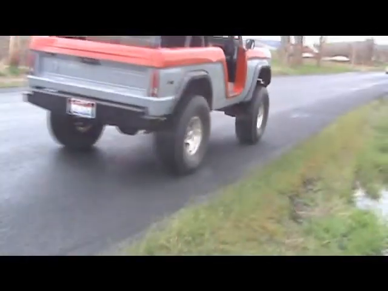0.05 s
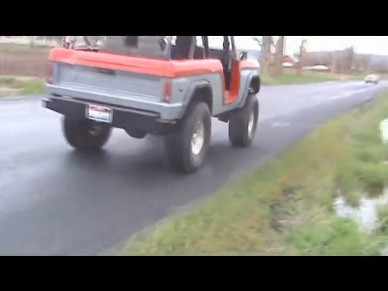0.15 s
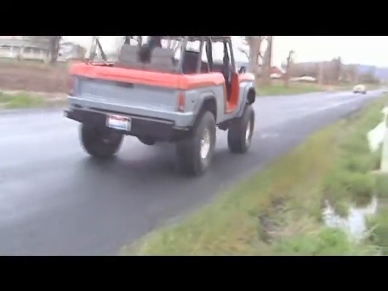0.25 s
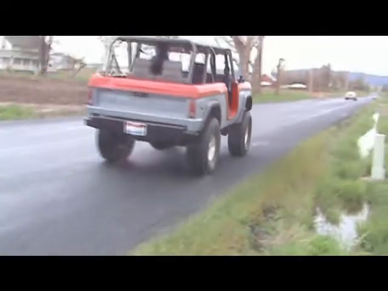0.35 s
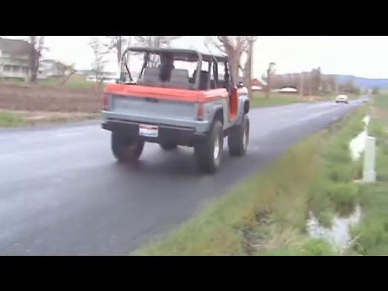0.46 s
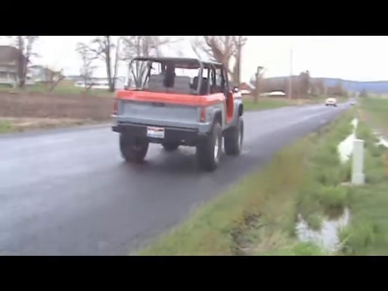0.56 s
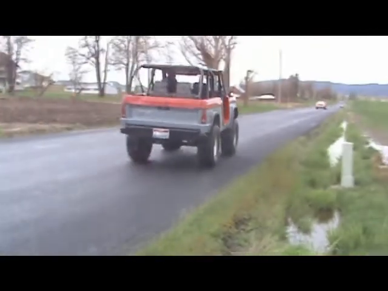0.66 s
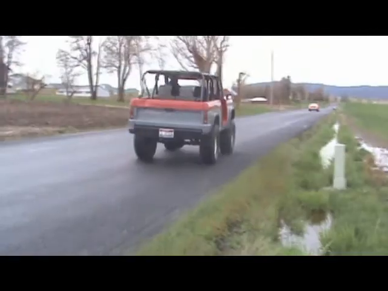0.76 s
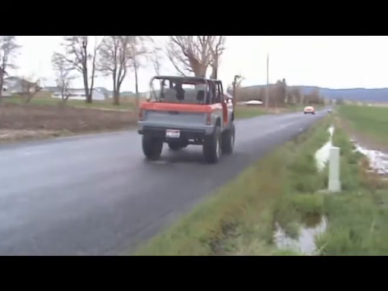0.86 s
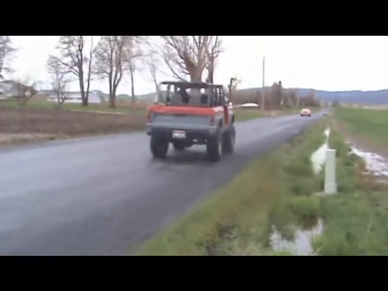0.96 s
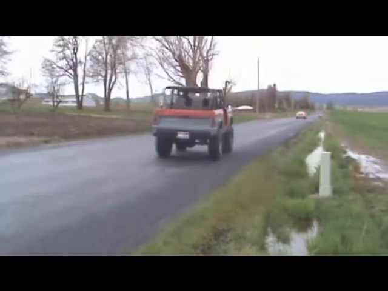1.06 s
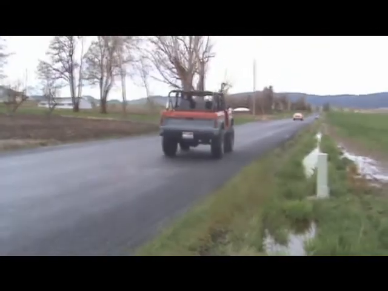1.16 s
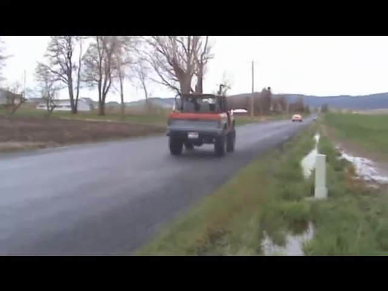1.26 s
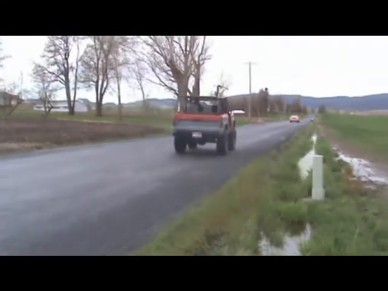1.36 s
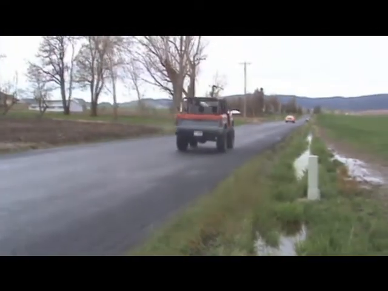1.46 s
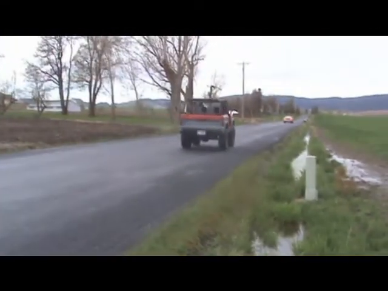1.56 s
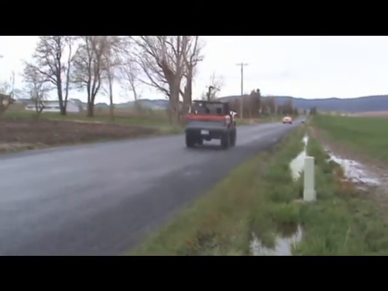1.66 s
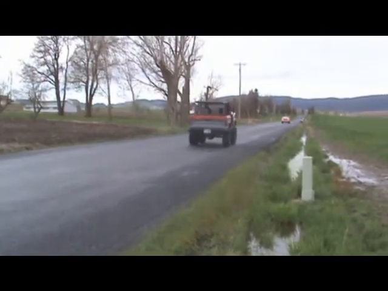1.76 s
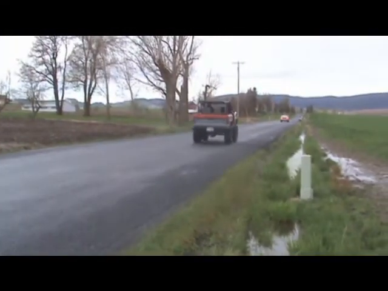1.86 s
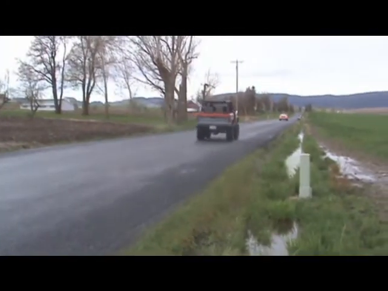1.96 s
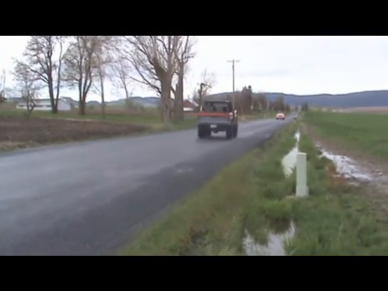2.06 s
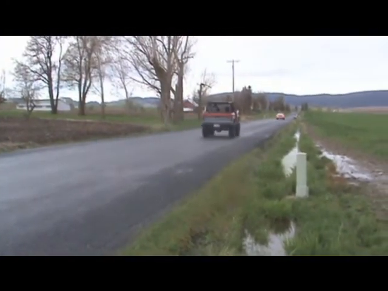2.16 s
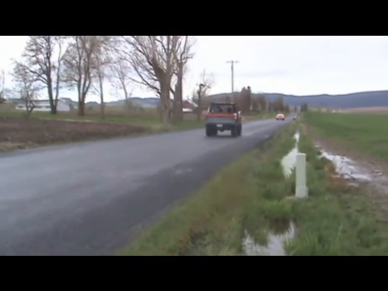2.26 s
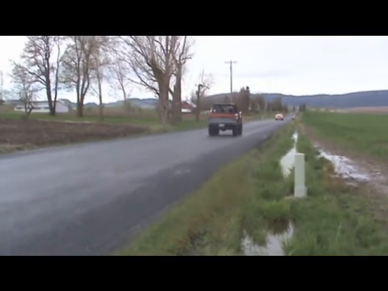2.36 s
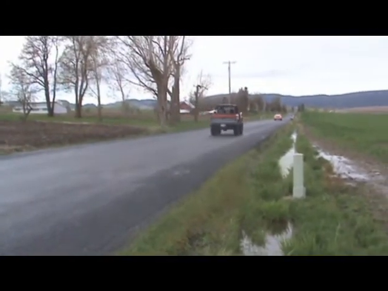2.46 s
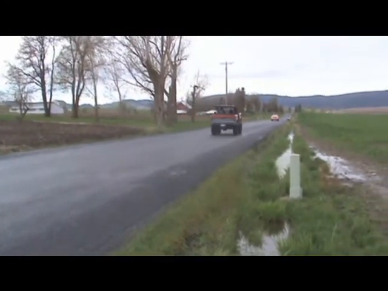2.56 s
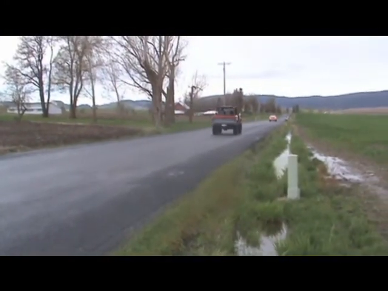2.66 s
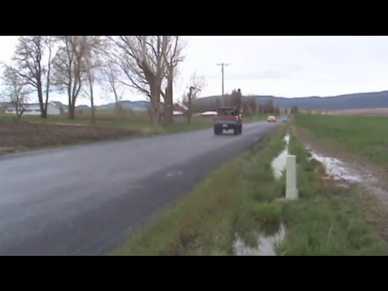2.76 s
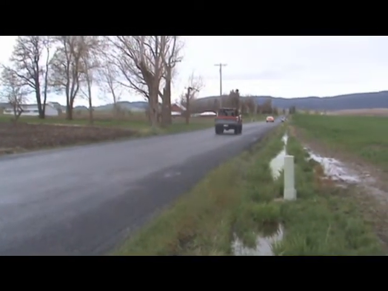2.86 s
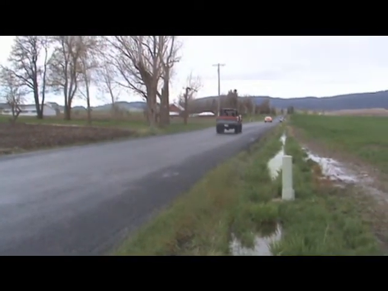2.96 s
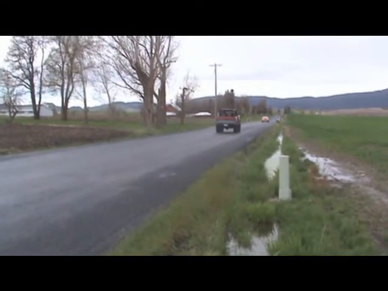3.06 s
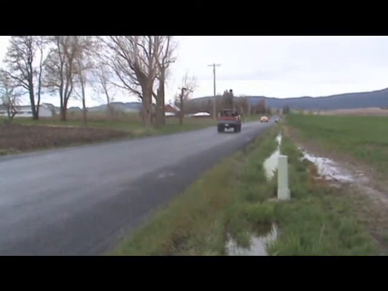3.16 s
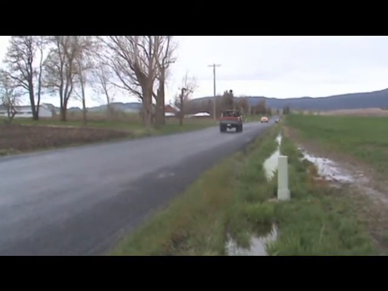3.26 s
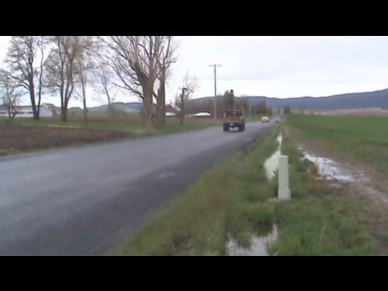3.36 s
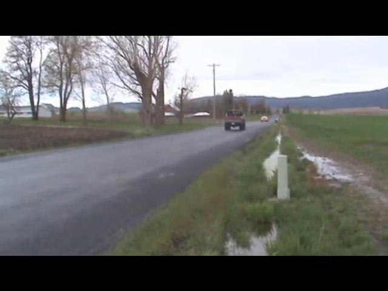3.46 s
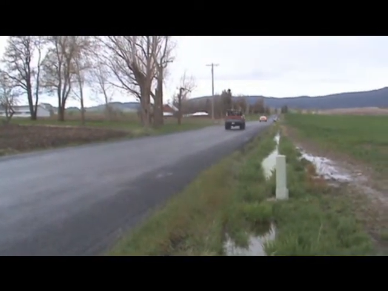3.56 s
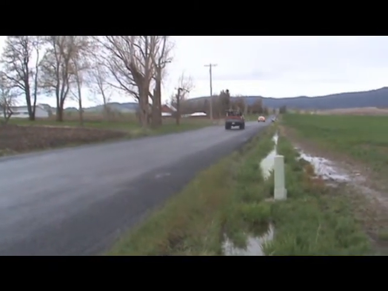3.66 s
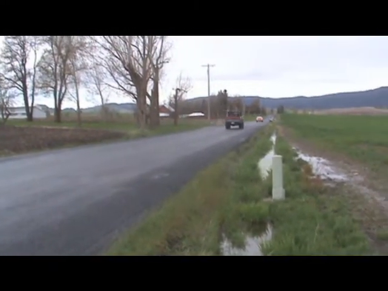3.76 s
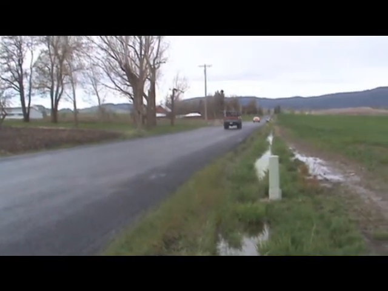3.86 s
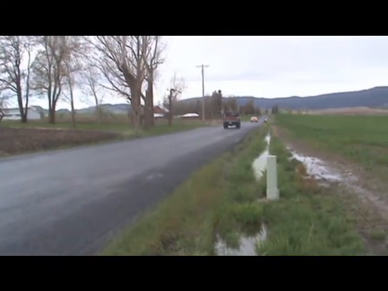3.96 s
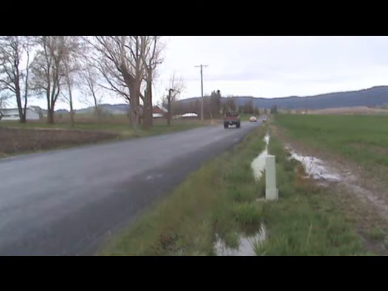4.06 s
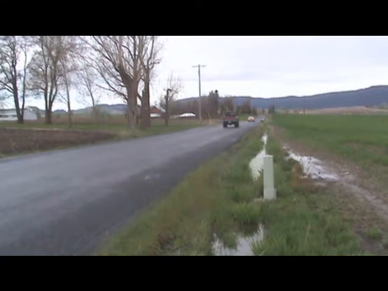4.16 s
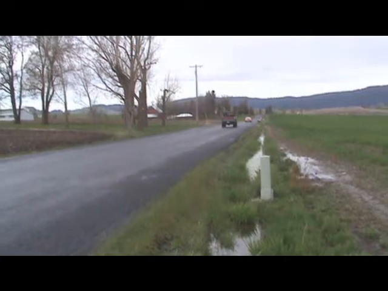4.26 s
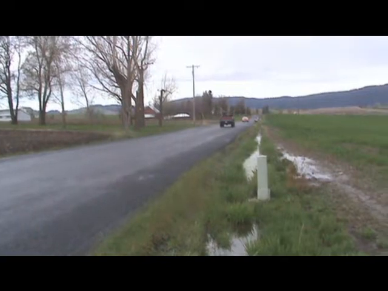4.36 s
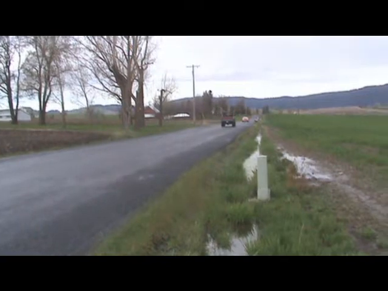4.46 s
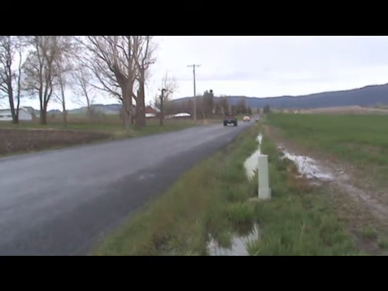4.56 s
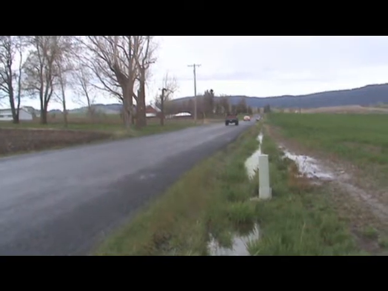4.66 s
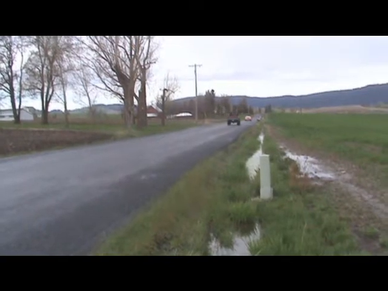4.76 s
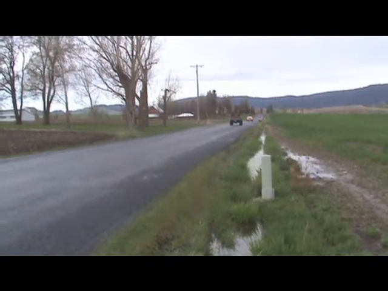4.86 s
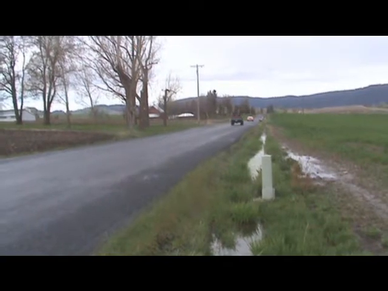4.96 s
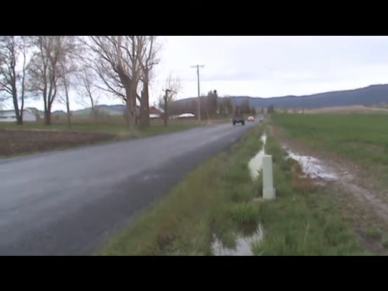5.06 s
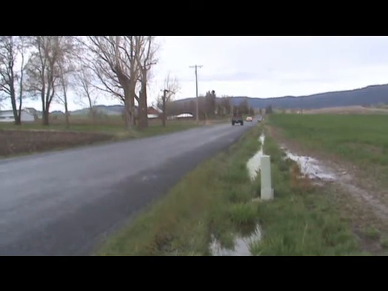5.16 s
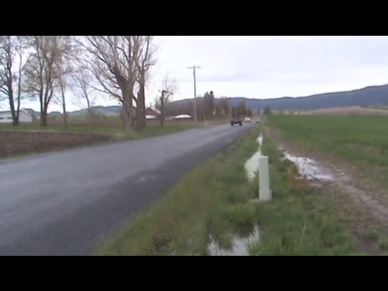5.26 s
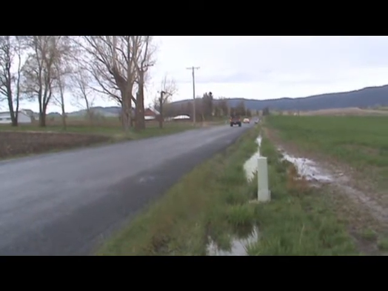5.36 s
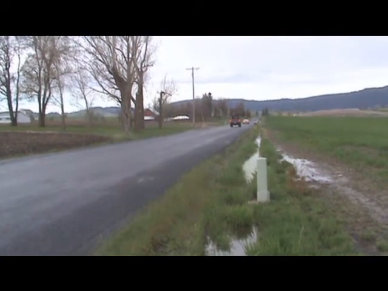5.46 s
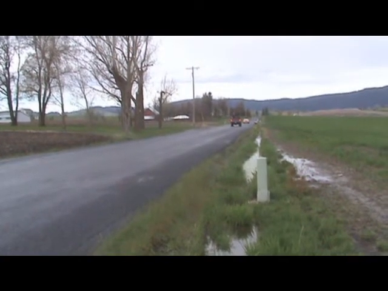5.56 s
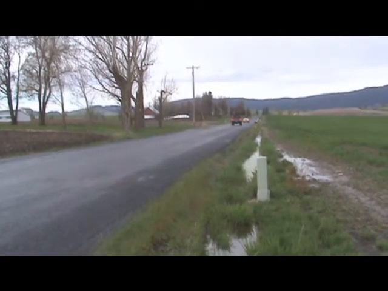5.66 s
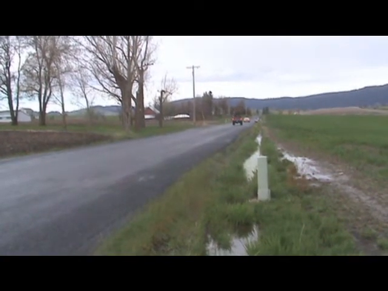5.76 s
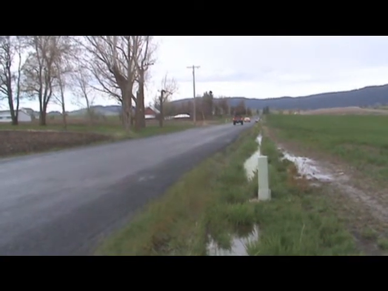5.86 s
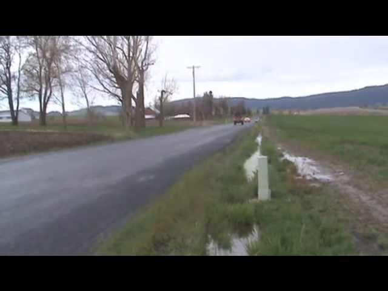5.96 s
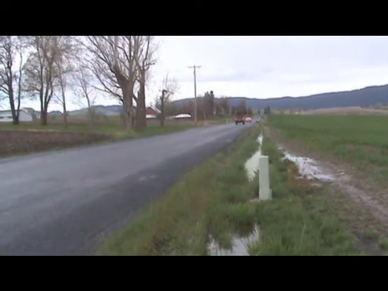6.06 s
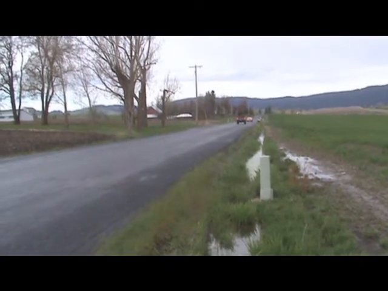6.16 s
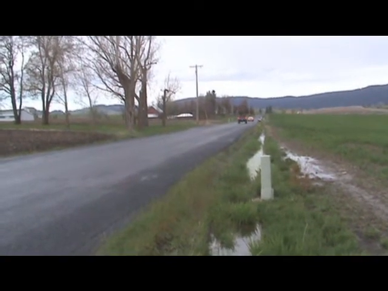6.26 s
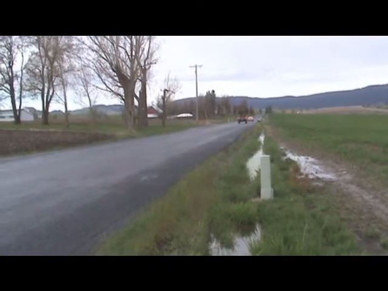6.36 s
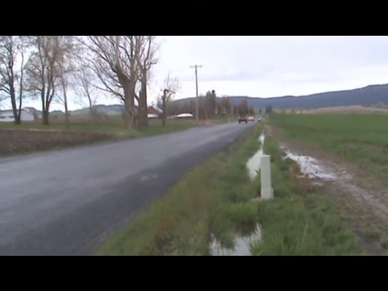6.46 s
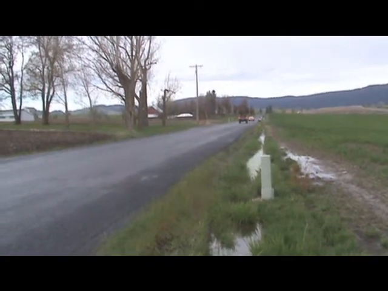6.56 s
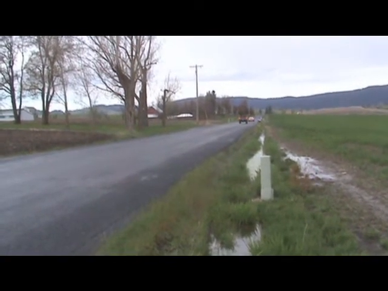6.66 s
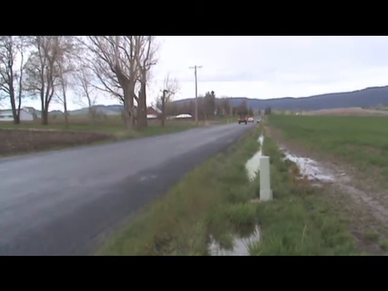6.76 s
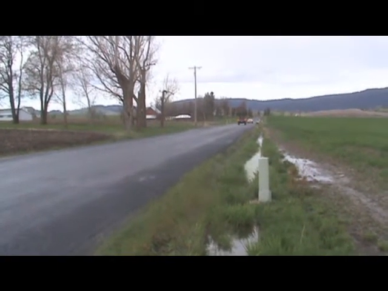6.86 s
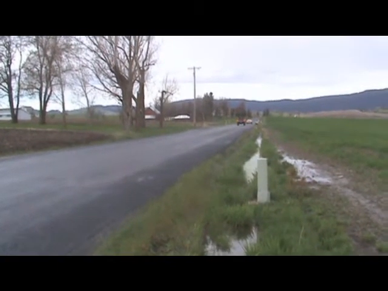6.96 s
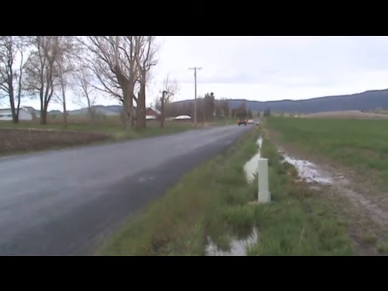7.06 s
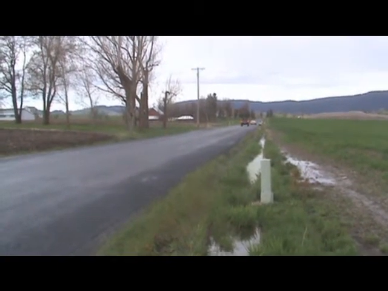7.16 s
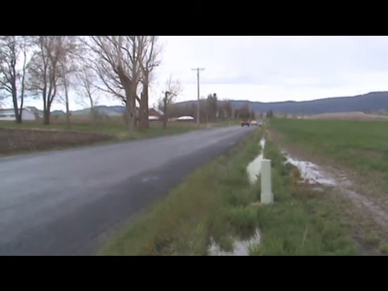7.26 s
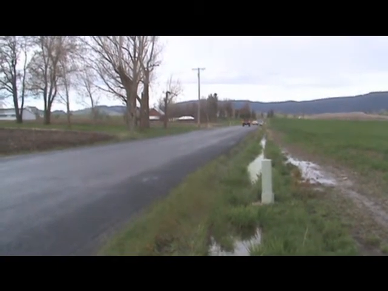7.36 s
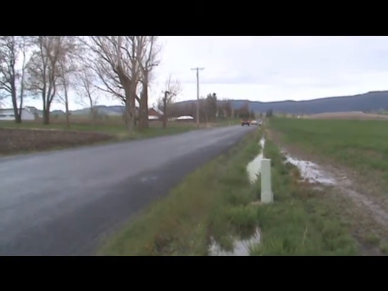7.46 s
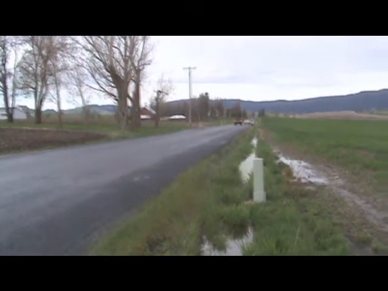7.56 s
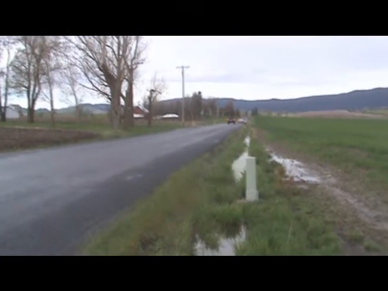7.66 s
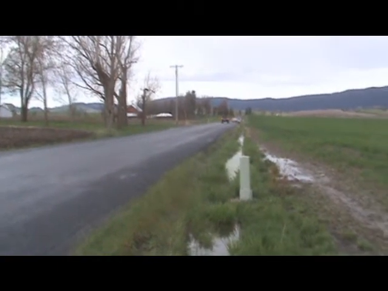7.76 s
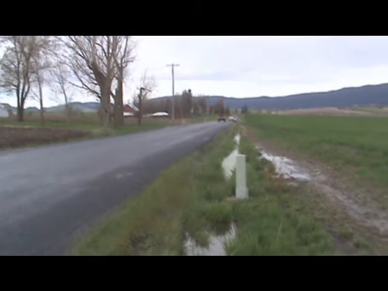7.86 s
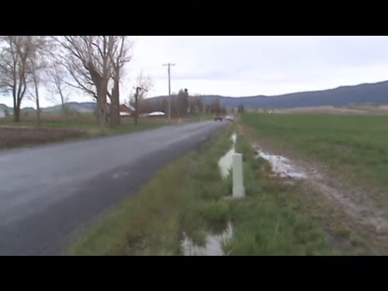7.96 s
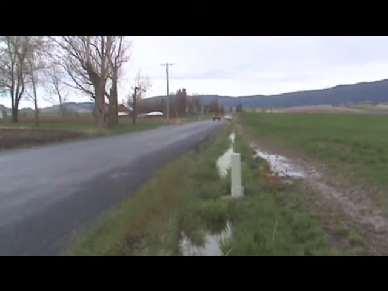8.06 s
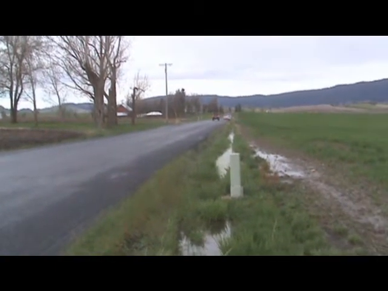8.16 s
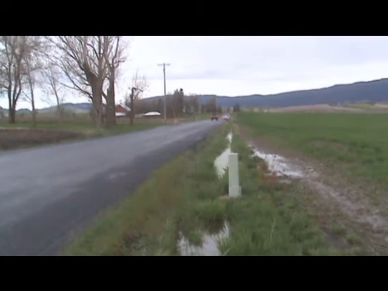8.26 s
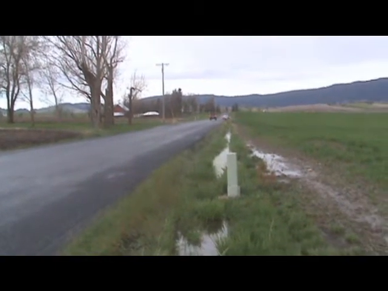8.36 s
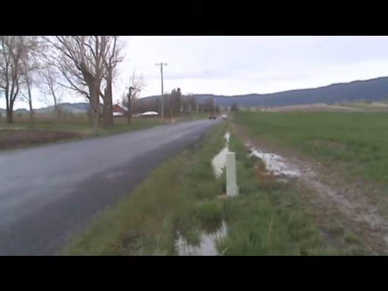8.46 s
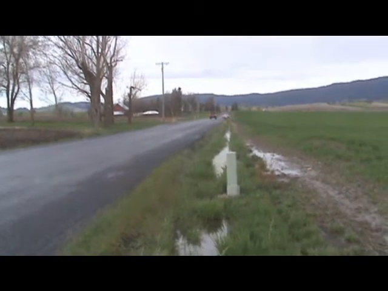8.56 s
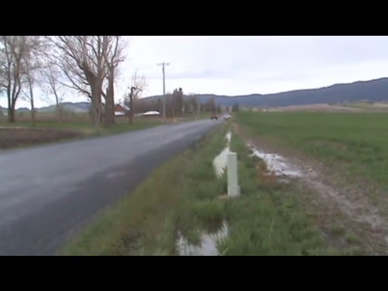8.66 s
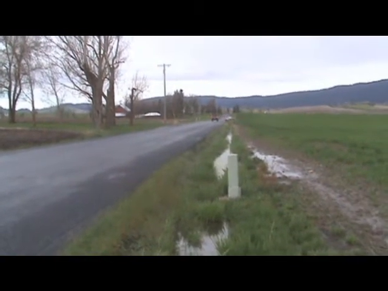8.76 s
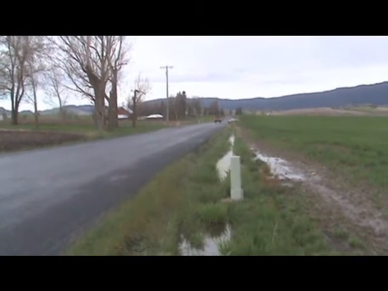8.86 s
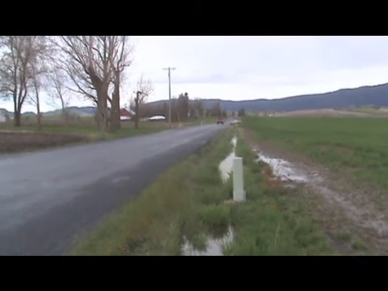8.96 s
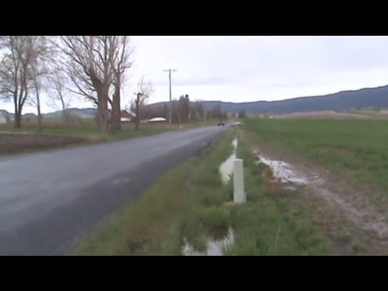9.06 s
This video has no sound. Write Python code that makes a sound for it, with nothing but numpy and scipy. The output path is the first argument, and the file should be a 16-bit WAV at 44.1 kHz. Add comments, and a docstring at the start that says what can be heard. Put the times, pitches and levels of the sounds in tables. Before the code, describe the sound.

Loud, uneven V8 exhaust roars off from close by, revs climbing with harsh rasps, before the throttle closes and only faint muffler thuds remain.

```python
"""A country road: an old open off-roader with a V8 pulls away from the microphones, booming and rasping.
Uneven firings ring modelled exhaust pipes, crack in the tailpipe and shed bursts of gas noise.
The driver lifts off after four and a half seconds: the engine drops to a far, uneven burble
from the muffler, the tyres' coloured noise fades, and thin gear tones sink with the road speed.
A dull echo from trees and houses and faint, still air lie around it."""
import sys
import numpy as np
from scipy import signal
from scipy.fft import rfft, irfft, next_fast_len
from scipy.io import wavfile
from scipy.ndimage import map_coordinates

SR = 44100
rng = np.random.default_rng(int(sys.argv[2]) if len(sys.argv) > 2 else 0)


def transcribe(signal):
    """Save signal, clipped to [-1, 1], as a 16-bit WAV file at the path in sys.argv[1]."""
    frames = np.atleast_2d(signal).T
    limited = np.clip(frames, -1, 1)
    pcm = np.round(limited * 32767).astype(np.int16)
    wavfile.write(sys.argv[1], SR, pcm)


N = 401295
TIME = np.arange(N) / SR

LIFT_S, CLOSING_S = 4.583, 0.38  # the driver lifts off; time the throttle takes to shut
# engine speed: time_s, rate_hz (four-stroke cycles per second)
CYCLE_RATE = [(0, 19.46), (.3, 20.195), (.7, 21.75), (1, 23.25), (1.5, 26.367), (2, 29.624), (2.4, 32.218),
              (2.7, 33.943), (3, 35.656), (3.5, 38.214), (4, 40.338), (4.48, 41.95), (4.53, 41.6),
              (4.6, 39.5), (4.7, 36.3), (4.8, 33.6), (5, 26.4), (5.2, 22.7), (5.5, 19.7), (5.75, 16.8),
              (6, 16.25), (7, 14.5), (7.6, 13.8), (9.1, 13.1)]
# exhaust pipe (0 or 1) that each of the eight cylinders feeds, in firing order
BANKS = (0, 1, 0, 0, 1, 0, 1, 1)
# colour of the top-treble gas noise, also used for the ticks: freq_hz, level_db (relative)
FIZZ_COLOUR = [(2120, -11), (3600, -3.5), (3990, -11), (4480, -7.5), (5160, -8.5), (5790, -18.5),
               (6920, -11), (8600, -11.5), (14200, -41)]


def amp(db):
    """Decibels to gain."""
    return 10 ** (np.asarray(db) / 20)


def unit(x):
    """Scale to rms 1."""
    return x / np.sqrt(np.mean(x ** 2) + 1e-20)


def steady(x):
    """Scale to rms 1 over every few engine cycles, keeping the single beats."""
    window = np.hanning(SR // 4)
    smooth = lambda v: signal.fftconvolve(v, window, "same")
    power = smooth(x * x) / smooth(np.ones(N))
    return x / np.sqrt(np.abs(power) + 1e-14)


def along(points, hz):
    """(Hz, value) points read on a log axis."""
    f, v = np.transpose(points)
    return np.interp(np.log(hz + 1), np.log(f + 1), v)


def curves(rows):
    """One value per sample for each column after the time."""
    s, *cols = np.transpose(rows)
    return [np.interp(TIME, s, c) for c in cols]


def wobble(rate):
    """A smooth random curve, rate knots a second."""
    knots = rng.standard_normal(int(N * rate / SR) + 4)
    return map_coordinates(knots, [TIME * rate])


def swell(s, length):
    """A smooth bump of height 1 around a moment."""
    return np.exp(-(2 * (TIME - s) / length) ** 2)


def spell(x, s, length, db):
    """Let x swell to a level around a moment and fade again."""
    bump = swell(s, length)
    return amp(db) * bump * x / np.sqrt(np.average(x * x, weights=bump) + 1e-20)


def filtered(x, response):
    """x times a complex response of frequency."""
    size = next_fast_len(N + SR // 2)
    spectrum = rfft(x, size) * response(np.fft.rfftfreq(size, 1 / SR))
    return irfft(spectrum, size)[..., :N]


def below(hz, edge):
    """Response of a steep low-pass without phase shift."""
    return 1 / (1 + (hz / edge) ** 10)


def cut(x, hz, kind, order=4):
    """A causal low-pass, high-pass or band-pass."""
    return signal.sosfilt(signal.butter(order, hz, kind, fs=SR, output="sos"), x)


def ring(x, modes, sign=-1):
    """x through resonances weighted by successive powers of sign; near 1 they start together and stay sharp."""
    def response(f):
        total = 0
        for k, (centre, width, db) in enumerate(modes):
            damping = 1j * f * width
            total = total + sign ** k * amp(db) * damping / (centre * centre - f * f + damping)
        return total
    return filtered(x, response)


def noise(spectrum):
    """Noise of rms 1 with the given colour."""
    return unit(filtered(rng.standard_normal(N), lambda hz: amp(along(spectrum, hz))))


def pulses(times, sizes):
    """Impulses placed between the samples by windowed sinc interpolation."""
    at = times[:, None] * SR
    taps = np.floor(at).astype(int) + np.arange(-7, 9)
    shape = np.sinc(taps - at) * np.sinc((taps - at) / 8)
    inside = (taps >= 0) & (taps < N)
    return np.bincount(taps[inside], (sizes[:, None] * shape)[inside], N)


def scattered(times, db, scatter_db, jitter):
    """A pulse train in which no two firings are quite alike; jitter is in seconds."""
    size, late = rng.standard_normal((len(times), 2)).T
    return pulses(times + jitter * late, amp(db + scatter_db * size))


def puffs(train, life, rest):
    """Gas flow: a burst that dies away after each pulse (life in s), over a steady stream."""
    flow = signal.lfilter([1], [1, -np.exp(-1 / (life * SR))], train)
    return unit(np.abs(flow)) + rest


def zing(start_hz, rest_hz, glide, t60, attack):
    """A steep front rings in the tailpipe, sliding down to its resting pitch; times in seconds."""
    t = np.arange(SR // 20) / SR
    hz = rest_hz + (start_hz - rest_hz) * np.exp(-t / glide)
    tone = np.sin(2 * np.pi * np.cumsum(hz) / SR)
    return tone * amp(-60 * t / t60) * (1 - np.exp(-t / attack))


def throttle_shut():
    """0 under load, 1 once the throttle has closed."""
    return np.clip((TIME - LIFT_S) / CLOSING_S, 0, 1)


def firings():
    """Time, push, front, crack and shake of every firing; the uneven V8 beat shifts with the revs."""
    # when the pulses leave the pipes: cycle_rate_hz, then the slot (eighths of a cycle) of each cylinder
    slots = [(20, .58, 1.08, 2.55, 3.38, 4.27, 5.38, 6.08, 7),
             (41, 1.05, 1.42, 2.74, 3.84, 4.59, 5.64, 6.57, 7.27)]
    # body of each pulse: cycle_rate_hz, then level_db of each cylinder
    push = [(19.3, -6.5, 10.5, -3.5, -10.5, 8.5, -6.5, 4.5, -11),
            (22.05, -2, 3, 1.5, 0.5, -2, -1.5, 5.5, -11.5),
            (29.2, -8, -3, -3, -15.5, -3.5, -4.5, -16, -2.5),
            (39.8, -2, -5.5, -11.5, -3, -3, -10, -9, -4.5)]
    # its steep front: cycle_rate_hz, then level_db of each cylinder
    front = [(20.5, -11.5, -16, -5.5, -13.5, -17.5, -18, -2.5, -23),
             (21.7, -10, -17, -4.5, -17, -15.5, -23.5, -7, -17), (30.9, -2, 2.5, 4, 0.5, 0, -2, -11, -8.5),
             (41, -5, -33.5, -4.5, -13, -12.5, -7.5, -33.5, -26)]
    # its crack in the tailpipe: cycle_rate_hz, then level_db of each cylinder
    crack = [(20, -11, -6.5, -16, -9.5, 4.5, -13, 1, -16), (25.2, -4.5, -11, -5, 0, -17, 5, 2, 1),
             (31.7, 3, 2.5, -2, 3.5, 4, 1.5, -9, -13), (40.2, 4.5, -5, -0.5, -7, -5.5, -1, -7.5, -11.5)]
    # how hard it shakes the pipe walls: cycle_rate_hz, then level_db of each cylinder
    shake = [(21, -17, 2, 4, -8, -2, -14.5, 7, -12.5), (25, 0.5, -18, -4.5, -3.5, -8, -9.5, 6, -9.5),
             (31, 0.5, -16.5, -2, -6.5, -14, 0, -9.5, -17.5), (40, 1, -26, -4, 2, -15, -5.5, -16, -21)]
    rate, = curves(CYCLE_RATE)
    cycles = np.cumsum(rate) / SR + .042  # crank position at the start, in cycles
    cycle = np.arange(int(cycles[-1]))
    revs = np.interp(cycle + .5, cycles, rate)

    def at_revs(table):
        table_rate, *cylinders = np.transpose(table)
        return np.transpose([np.interp(revs, table_rate, c) for c in cylinders])
    times = np.interp(cycle[:, None] + at_revs(slots) / len(BANKS), cycles, TIME)
    return [times.ravel()] + [at_revs(table).ravel() for table in (push, front, crack, shake)]


def exhaust_levels(distance):
    """Gains of boom, bark, rasp, fizz and edge: distance and flares, then lift-off, where the rasp lingers longest."""
    # exhaust under load, before trims and lift-off: time_s, bass_db, middle_db
    pull = [(0.0, -25, -27.5), (0.09, -26, -30.5), (0.61, -26, -35.5), (1.11, -23.5, -31),
            (2.0, -31.5, -32.5), (3.07, -34.5, -36.5), (4.06, -27.5, -35.5), (4.5, -27.5, -35)]
    # treble before flares and lift-off: time_s, level_db
    treble = [(0, -36.5), (.6, -36.5), (1.05, -40.5), (1.45, -48), (1.9, -45.5), (2.3, -46), (2.5, -51.5),
              (2.88, -42.5), (3.3, -43), (4.4, -44.5)]
    # harsh flares of the exhaust: centre_s, length_s, extra_rasp_db, extra_fizz_db, edge_level_db
    flares = [(0.588, 0.2, 1, 1.5, -73), (1.43, 0.52, 7, 6.5, -56), (2.3, 0.19, 6, 2.5, -67),
              (2.734, 0.25, 1, 5.5, -53), (3.69, 0.2, 6, 0.5, -53), (4.072, 0.22, 3, 0, -45.5),
              (4.593, 0.26, 6, -1, -52)]
    (bass_db, middle_db), (treble_db,) = curves(pull), curves(treble)
    shut = throttle_shut()
    doublings = np.log2(distance / distance[0])
    # the first numbers of boom and bark are trims; the factors of shut are dB lost with the throttle shut
    boom_db = bass_db - 0.92 - 20.5 * shut
    bark_db = middle_db - 2 - 19 * shut ** 1.2
    rasp_db = treble_db - 23 * shut ** 2.8
    fizz_db = -41.5 - 3.5 * doublings - 19 * shut ** 1.3  # loses 3.5 dB each time the distance doubles
    edge = np.zeros(N)
    for s, length, extra_rasp_db, extra_fizz_db, edge_db in flares:
        flare = swell(s, length)
        rasp_db = rasp_db + extra_rasp_db * flare
        fizz_db = fizz_db + extra_fizz_db * flare
        edge = edge + amp(edge_db) * flare
    # the last firm firings fade by 7 dB a second, then give out by 5 dB around 5.44 s
    overrun_db = -7 * np.maximum(TIME - LIFT_S - CLOSING_S, 0)
    overrun_db = overrun_db - 5 * (1 + np.tanh((TIME - 5.44) / 0.12)) / 2
    return [amp(db + overrun_db) for db in (boom_db, bark_db, rasp_db, fizz_db)] + [edge]


def twin_pipes(times, db, scatter_db, jitter):
    """Each bank of four cylinders blows into its own resonant pipe."""
    # resonances of the first exhaust pipe: centre_hz, width_hz, level_db (before the ring's weighting)
    pipe_a = [(74.9, 12.6, -7), (204, 31.2, -0.5), (268, 1100, -21.5), (358, 44, -11), (559.4, 72, -11),
              (720, 22, -15.5), (830, 38, -32)]
    # resonances of the second exhaust pipe: centre_hz, width_hz, level_db (before the ring's weighting)
    pipe_b = [(70, 12, -12.5), (99.7, 11.5, -18), (111.4, 44, -12.5), (206.4, 34.4, -3), (366.3, 30.6, -10),
              (602, 63, -5.5), (743, 59, -8)]
    bank = np.resize(BANKS, len(times))
    out = 0
    for k, pipe in enumerate((pipe_a, pipe_b)):
        blows = scattered(times[bank == k], db[bank == k], scatter_db, jitter)
        out = out + ring(blows, pipe, sign=0.92)
    return out


def humming(boom):
    """Swell or thin the deep hum within the boom, fullest while the car is near."""
    # change at the hum's own pitch: time_s, gain_db
    hum = [(0, 2), (1.4, 3), (2.3, -0.5), (3.5, -5.5), (4.9, -5.5)]
    hum_db, = curves(hum)
    hum_hz, width_hz = 108, 40
    return boom + (amp(hum_db) - 1) * filtered(boom, lambda hz: np.exp(-((hz - hum_hz) / width_hz) ** 2))


def booming(times, push_db):
    """The bodies of the pulses set the lowest pipe resonances booming."""
    pipes = twin_pipes(times, push_db, scatter_db=.5, jitter=.00003)
    return humming(steady(filtered(pipes, lambda hz: below(hz, 445))))


def echoed(x, delay, share):
    """x plus a copy whose delay (s) moves."""
    return x + share * map_coordinates(x, [(TIME - delay) * SR])


def barking(times, bark_db, distance):
    """Steep fronts bark in the pipes over a rush of gas, which also arrives bounced off the road."""
    # colour of the gas rush: freq_hz, level_db (relative)
    gas_colour = [(260, -38.5), (450, -25.5), (575, -17), (670, -7.5), (745, -4), (916, -14), (1280, -12.5),
                  (1610, -10), (2200, -14.5), (2860, -64), (4840, -120)]
    bounce = 2 * .45 * 1.5 / distance / 343  # extra path in s, from pipe and microphone heights in m
    front = scattered(times, bark_db, scatter_db=0.0, jitter=.00003)
    pipes = twin_pipes(times, bark_db, scatter_db=1.5, jitter=.00002)
    bark = steady(filtered(pipes, lambda hz: (1 - below(hz, 486)) * below(hz, 956)))
    gas = steady(noise(gas_colour) * puffs(front, life=0.033, rest=1.0))
    return steady(bark + amp(-11.5) * echoed(gas, bounce, share=1.0))


def tip_note(x):
    """x through a narrow resonance of the tailpipe tip, whose pitch moves."""
    # lingering note of the tip: time_s, pitch_hz, level_db (relative to the main zing)
    tip = [(0, 2769, -8.5), (.6, 2700, 0.5), (1.2, 2670, -3), (1.6, 2820, -15.5), (2.05, 2760, -11),
           (2.3, 2770, -3), (2.55, 2460, -19), (2.9, 2610, -2), (3.7, 2570, -3), (4.5, 2530, -4.5),
           (4.85, 2600, -0.5)]
    width_hz, waver = 207, 0.023  # the hot gas makes its pitch waver by this share
    hz, level_db = curves(tip)
    turn = np.exp(2j * np.pi * np.cumsum(hz * (1 + waver * wobble(20))) / SR)
    # shift the note down to 0 Hz, low-pass it there and shift it back
    note = (cut(x / turn, width_hz / 2, "low", order=2) * turn).real
    return amp(level_db) * steady(note)


def rasping(crack, spit):
    """The cracks ring the tailpipe and shed gas noise, in ragged bursts; spit is the share of ringing."""
    # modes of the tailpipe: centre_hz, width_hz, level_db (relative)
    tailpipe = [(1843, 580, -2), (2660, 435, 7.5), (3110, 400, 1), (4170, 740, -14.5)]
    gas = ring(rng.standard_normal(N) * puffs(crack, life=0.0012, rest=1.0), tailpipe)
    gas = steady(cut(gas, [1500, 5000], "band"))
    note = zing(start_hz=4070, rest_hz=2675, glide=0.00066, t60=0.017, attack=0.00091)
    snap = steady(signal.fftconvolve(crack, note)[:N])
    # the front also knocks the lowest tailpipe mode
    snap = snap + amp(-7.0) * steady(cut(ring(crack, tailpipe[:1]), 1530, "high"))
    snap = snap + tip_note(crack)
    rasp = steady(cut(spit * snap + (1 - spit) * gas, 4740, "low"))
    return rasp * amp(0.83 * wobble(17))


def fizzing(crack, spit, distance):
    """Gas noise hisses in sharp spits and a stream; air and grass take the top treble with distance."""
    fizz = noise(FIZZ_COLOUR)
    bursts = steady(fizz * puffs(crack, life=0.0035, rest=0.028))
    fizz = steady(spit * bursts + (1 - spit) * fizz)
    closeness = np.clip(10 / distance, 0, 1) ** 2
    dulled = steady(filtered(fizz, lambda hz: below(hz, 9640)))
    fizz = closeness * fizz + (1 - closeness) * dulled
    return amp(1.15 * wobble(23.9)) * fizz


def harsh_edge(crack):
    """Short gas bursts ring one high resonance, the sharp edge of a flare."""
    # resonance of the edge: centre_hz, width_hz, level_db (relative)
    edge_mode = [(4260, 460, 0)]
    return steady(ring(noise(FIZZ_COLOUR) * puffs(crack, life=0.0014, rest=0.24), edge_mode))


def honking(times):
    """One cylinder after another stands out and rings a hollow pipe note."""
    # spells of honking: centre_s, length_s, pitch_hz, level_db
    honks = [(0.15, 0.27, 800, -34), (0.61, 0.27, 690, -43), (0.98, 0.69, 758, -36.5),
             (.27, 0.18, 860, -38), (1.65, .42, 810, -39.5), (1.48, 0.56, 760, -37.5),
             (1.27, 0.34, 700, -40), (1.93, 0.2, 800, -39), (4.2, 0.85, 750, -45), (4.78, 0.14, 780, -50)]
    # which cylinder (0-7) honks in each spell
    honkers = (6, 6, 2, 1, 2, 6, 0, 3, 3, 3)
    lag_s, width_hz = 0.00065, 110  # the note speaks just after the firing
    out = np.zeros(N)
    for cylinder, (s, length, hz, db) in zip(honkers, honks):
        blows = scattered(times[cylinder::len(BANKS)] + lag_s, 0, scatter_db=2.2, jitter=.0001)
        pipe = signal.lfilter(*signal.iirpeak(hz, hz / width_hz, fs=SR), blows)
        out += spell(cut(pipe, [560, 1200], "band", order=2), s, length, db)
    return out


def pulling(times, push_db, bark_db, crack_db):
    """Under load the pulses boom in the pipes; their steep fronts bark, crack in the tailpipe and shed gas noise."""
    # distance of the tailpipe: time_s, distance_m
    road = [(0, 2.64), (.5, 5), (1, 8.8), (2, 15.8), (3, 32), (4.5, 40)]
    # how much of the treble comes in sharp spits: time_s, share (0-1)
    crackle = [(1.15, 0.5), (1.3, 0.83), (1.6, 0.74), (2.2, 0.64), (3.2, 0.53), (4.6, 0.48)]
    (distance,), (share,) = curves(road), curves(crackle)
    boom_level, bark_level, rasp_level, fizz_level, edge_level = exhaust_levels(distance)
    spit = np.clip(share, 0, 1)
    crack = scattered(times, crack_db, scatter_db=3.0, jitter=.00006)
    out = boom_level * booming(times, push_db)
    out = out + bark_level * barking(times, bark_db, distance)
    out = out + rasp_level * rasping(crack, spit)
    out = out + fizz_level * fizzing(crack, spit, distance)
    out = out + edge_level * harsh_edge(crack)
    return out + honking(times)


def snarling(times, shake_db, gas_share):
    """The pulses and the gas that follows them ring the thin pipe walls."""
    # modes of the walls: centre_hz, width_hz, level_db (relative)
    walls = [(930, 47, -11.5), (1091, 98, -1), (1186, 110, 0), (1330, 140, -3.5)]
    # snarl before lift-off: time_s, level_db
    snarl = [(0, -41.5), (.35, -34.5), (.65, -41), (.95, -47.5), (1.4, -41), (1.9, -41), (2.35, -40.5),
             (3, -43), (3.4, -45), (3.75, -43), (4.15, -50), (4.55, -45.5)]
    level_db, = curves(snarl)
    blows = scattered(times, shake_db, scatter_db=2.4, jitter=.00003)
    gas = steady(ring(rng.standard_normal(N) * puffs(blows, life=0.01, rest=0.65), walls))
    ringing = steady(ring(blows, walls)) + gas_share * gas
    ringing = steady(cut(ringing, [800, 1550], "band", order=2))
    shut = throttle_shut()
    return amp(level_db - 11 * shut) * (1 - shut ** 4) * ringing


def spitting(times, shock_db):
    """One cylinder's front steepens to a shock and zings once a cycle; the note sinks as the car speeds away."""
    # spells of spitting: centre_s, length_s, pitch_hz (where the zing settles), level_db (before filters)
    spits = [(0.048, 0.15, 2920, -42), (0.597, .15, 2760, -37.5), (.8, 0.37, 2770, -44),
             (1.416, 0.49, 2800, -48), (2.5, 0.32, 2650, -50.5), (3.325, 0.41, 2565, -48),
             (3.76, 0.54, 2587, -44), (4.198, .4, 2540, -47), (4.53, 0.27, 2495, -39.5)]
    # which cylinder (0-7) spits in each spell
    spitters = (4, 1, 3, 2, 0, 0, 0, 0, 0)
    # other modes that a spit rings: centre_hz, width_hz, level_db (relative)
    shock_modes = [(1875, 100, -0.5), (2125, 130, 1), (3170, 300, -1.5), (4250, 350, -10)]
    zings, fronts = np.zeros((2, N))
    for cylinder, (s, length, hz, db) in zip(spitters, spits):
        shocks = scattered(times[cylinder::len(BANKS)], 0, scatter_db=1.5, jitter=.00003)
        note = zing(start_hz=1.342 * hz, rest_hz=hz, glide=0.0011, t60=0.026, attack=0.0022)
        zings += spell(signal.oaconvolve(shocks, note)[:N], s, length, db)
        fronts += spell(shocks, s, length, db)
    knocks = cut(ring(fronts, shock_modes), [1600, 5000], "band", order=2)
    return cut(zings, 2100, "high", order=3) + amp(shock_db) * knocks


def tyres():
    """Tread noise, a roar and a hiss, recedes down the road, wavering in the moving air."""
    # colour of the roar: freq_hz, level_db (relative)
    roar_colour = [(150, -24), (250, -7), (355, -5), (383, -9.5), (445, -11), (708, -9.5), (906, -16.5),
                   (1790, -21.5), (2400, -44.5), (3120, -64), (5280, -120)]
    # colour of the hiss: freq_hz, level_db (relative)
    hiss_colour = [(1180, -17), (2000, 1), (2520, 0), (2820, -9.5), (3160, -5), (6090, -25), (7290, -28.5),
                   (9710, -37.5), (14200, -64)]
    gone = np.maximum(TIME - 4.34, 0)  # seconds since the fade began; both lose 2.5 dB a second
    roar = amp(-48.5 - 2.5 * gone + 0.55 * wobble(5.2)) * noise(roar_colour)
    hiss = amp(-63.5 - 2.5 * gone + 1.3 * wobble(7.5)) * noise(hiss_colour)
    return roar + hiss


def ticks():
    """Tiny dry snaps and rustles: noise that starts at once and dies away."""
    # single snaps: start_s, peak_db (of the envelope), t60_s
    snaps = [(1.339, -37, .02), (1.394, -42, .015), (1.473, -32, .015), (5.117, -66, 0.02),
             (5.868, -67, 0.034), (6.4901, -67, .09), (6.5294, -74, .07)]
    envelope = sum(amp(db - 60 * np.abs(TIME - s) / t60) * (TIME >= s) for s, db, t60 in snaps)
    return envelope * noise(FIZZ_COLOUR)


def coasting(times, push_db):
    """With the throttle shut the cylinders thud weakly and unevenly in the muffler, over a sagging low note."""
    # burble before its uneven beat: time_s, level_db
    coast = [(4.9, -39), (5.6, -48), (6.8, -46), (9.1, -52)]
    # resonances of the muffler: centre_hz, width_hz, level_db (relative)
    muffler = [(68.3, 14, -13.5), (126, 11, -15.5), (163.5, 16, 0.5), (189.8, 16, 1), (276, 51, -16),
               (351, 8.1, -14), (576, 74, -26.5)]
    # the loudest thumps in the muffler: centre_s, gain_db (over the burble)
    thumps = [(6.22, 5), (6.39, 7), (6.63, 6.5), (6.75, 2.5), (7.23, 4), (7.52, 5), (7.66, 4), (8.26, 2.5),
              (8.56, 2)]
    # engine tones that swell as the revs sag: centre_s, length_s, level_db
    drones = [(5.28, .62, -50.5), (4.94, .48, -40.5), (5.9, 1.7, -55), (5.18, .3, -47), (5.25, .4, -57),
              (4.77, .16, -46)]
    # multiple of the engine cycle rate that each of those tones follows
    orders = (3, 6, 8, 8, 14, 8)
    (burble_db,), (rate,) = curves(coast), curves(CYCLE_RATE)
    thuds = scattered(times, 0.1 * push_db, scatter_db=5.0, jitter=0.00093)
    burble = steady(cut(cut(ring(thuds, muffler), 920, "low"), 54, "high"))
    uneven_db = 0.8 * wobble(14) + sum(db * swell(s, 0.046) for s, db in thumps)
    cycle_phase = 2 * np.pi * np.cumsum(rate) / SR
    drone = 0
    for k, (s, length, db) in zip(orders, drones):
        drone = drone + amp(db) * swell(s, length) * np.sqrt(2) * np.sin(k * cycle_phase)
    return amp(burble_db + uneven_db) * burble * throttle_shut() + drone


def whine(flutter, waver_db):
    """Thin, fluttering tones of meshing teeth, all sinking with the road speed."""
    # swells of gear tone: centre_s, length_s, ratio (to the main mesh pitch), level_db (relative)
    gear_tones = [(6, 0.18, 0.96, -71), (6.377, .25, 0.92, -73), (6.75, .2, 0.93, -74),
                  (7.08, .4, 0.97, -66), (7.683, 0.64, 1, -68), (8.15, .2, 1, -72), (8.97, 0.32, 0.98, -65),
                  (6.15, .45, .89, -73), (6.9, .35, .89, -70), (7.38, 0.61, .78, -69.5),
                  (6.35, .25, 1.5, -75), (6.8, .25, 1.66, -80), (7.65, 0.63, 1.89, -79)]
    hz = 2090 * np.exp(-.1235 * (TIME - 6))  # mesh pitch at 6 s; decay rate of the road speed per second
    phase = 2 * np.pi * np.cumsum(hz * (1 + flutter * wobble(90))) / SR
    level = amp(waver_db * wobble(24))
    return level * sum(amp(db) * swell(s, length) * np.sin(ratio * phase) for s, length, ratio, db in gear_tones)


def roadside(x, t60, wet_db):
    """Trees and houses scatter a dull, thin echo."""
    t = np.arange(SR) / SR
    tail = rng.standard_normal((2, SR)) * amp(-60 * t / t60) * (1 - np.exp(-t / 0.0052))
    tail = cut(tail, 4400, "low", order=1)
    return amp(wet_db) * signal.fftconvolve(x[None], tail / np.linalg.norm(tail[0]), axes=1)[:, :N]


def ports(x, side, lean):
    """Two close microphone ports: a difference a quarter turn ahead of their sum, plus a lean to one port."""
    def difference(hz):
        quadrature = amp(along(side, hz))
        return 1j * quadrature + (1 + quadrature ** 2) * np.tanh(np.log(amp(along(lean, hz))) / 2)
    apart = filtered(x, difference)
    return np.array([x + apart, x - apart])


def scene():
    """The car near and far, its echo, and the still country air."""
    # quarter-turn difference of the ports for the pulling car: freq_hz, level_db (relative to the sum)
    side_near = [(60, -8), (110, -3), (200, -1.5), (370, -1.5), (670, -2.5), (1230, -5.5), (2240, -8.5),
                 (4100, -11), (7490, -24.5), (13700, -26)]
    # the same for the coasting car, tyres, gears and ticks: freq_hz, level_db (relative to the sum)
    side_far = [(60, -22), (110, -9.5), (200, -8), (370, -5.5), (670, -5.5), (1230, -6.5), (2240, -8.5),
                (4100, -14.5), (7490, -27), (13700, -23.5)]
    # lean towards the first port for the pulling car: freq_hz, lean_db
    lean_near = [(60, -0.5), (110, 2), (200, 3), (370, 2), (670, 0.5), (1230, -2), (2240, -0.5), (4100, 2),
                 (7490, 1.0), (13700, -1)]
    # the same for the coasting car, tyres, gears and ticks: freq_hz, lean_db
    lean_far = [(60, 0.5), (110, 1.0), (200, 2.0), (370, 1.0), (670, 0.46), (1230, -1.7), (2240, -1.3),
                (4100, 0.0), (7490, 0.0), (13700, 0.0)]
    # colour of the still air: freq_hz, level_db (relative)
    air_colour = [(20, -7.5), (60, -14.5), (150, -14.5), (400, -28.5), (1500, -26.5), (6000, -37.5),
                  (14000, -42)]
    times, push_db, bark_db, crack_db, shake_db = firings()
    near = pulling(times, push_db, bark_db, crack_db)
    near = near + spitting(times, shock_db=9) + snarling(times, shake_db, gas_share=0.81)
    gears = amp(2.0) * whine(flutter=.015, waver_db=2.5)
    far = coasting(times, push_db) + tyres() + gears + ticks()
    air = amp(-75) * np.array([noise(air_colour), noise(air_colour)])
    direct = ports(near, side_near, lean_near) + ports(far, side_far, lean_far)
    return direct + roadside(near + far, t60=0.42, wet_db=-16.5) + air


def record(dry):
    """The recorder keeps nothing above its band limit."""
    return filtered(dry, lambda hz: hz < 14300)


dry = scene()
out = record(dry)
transcribe(out)
```